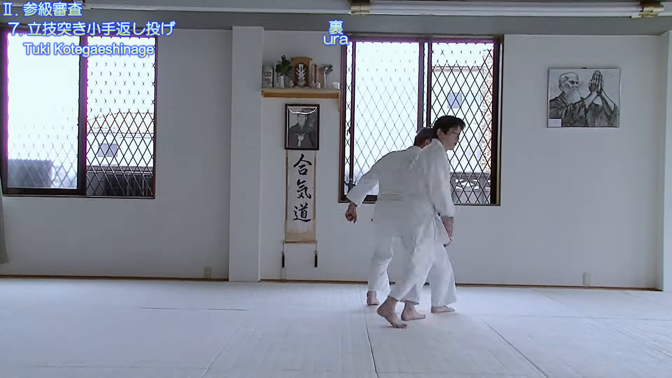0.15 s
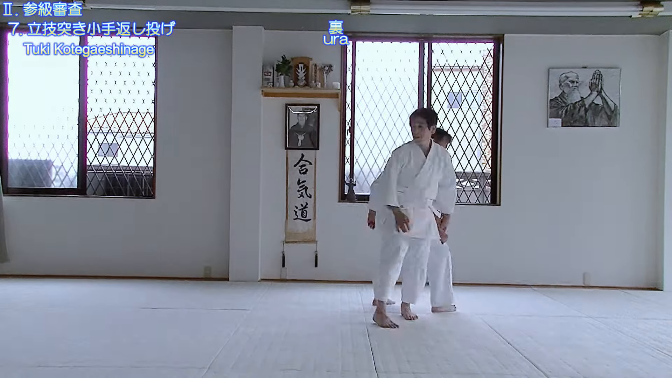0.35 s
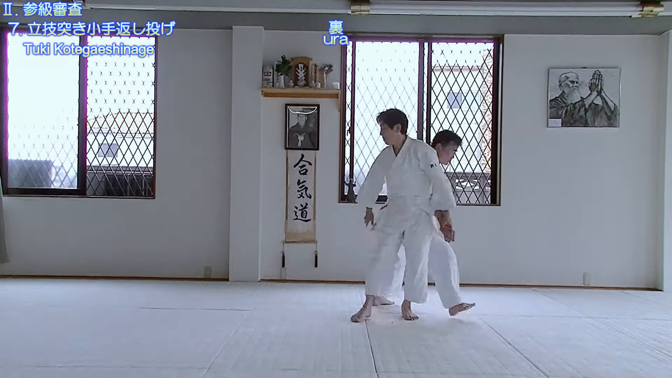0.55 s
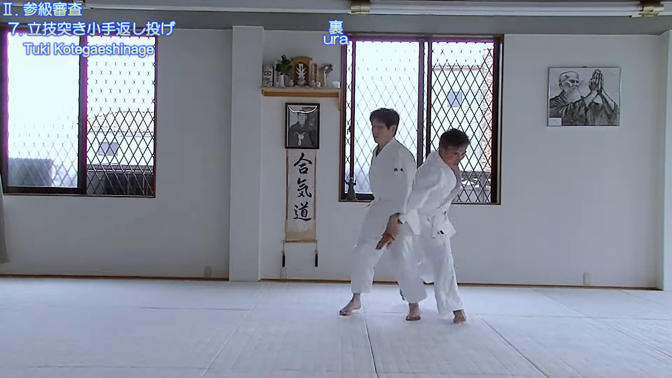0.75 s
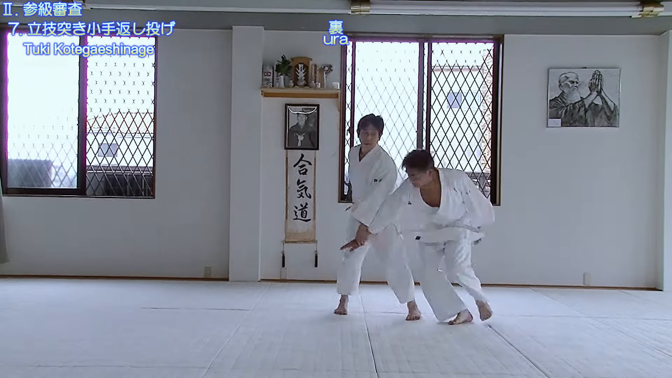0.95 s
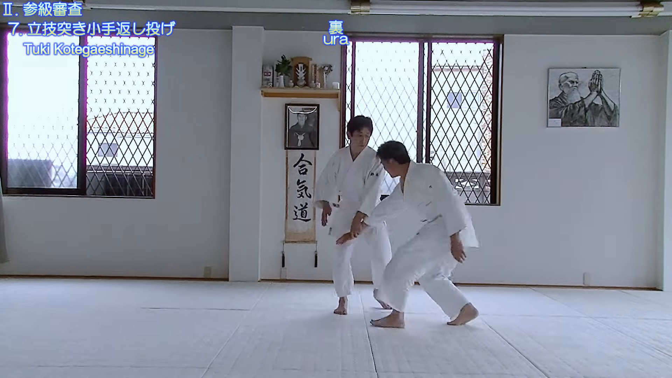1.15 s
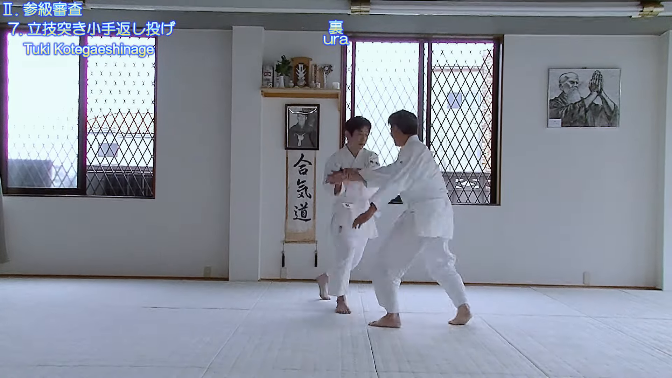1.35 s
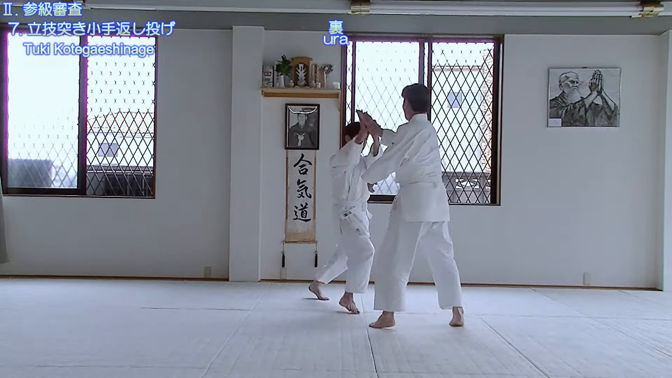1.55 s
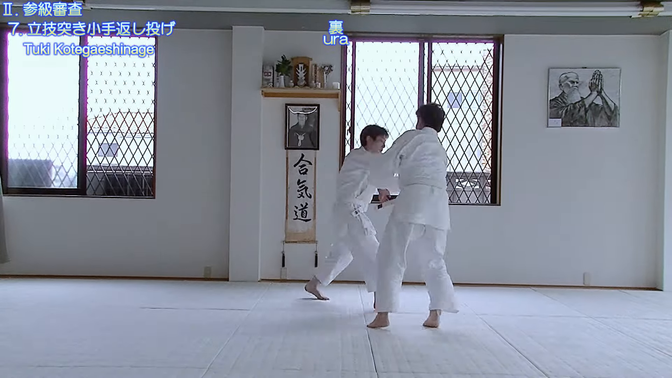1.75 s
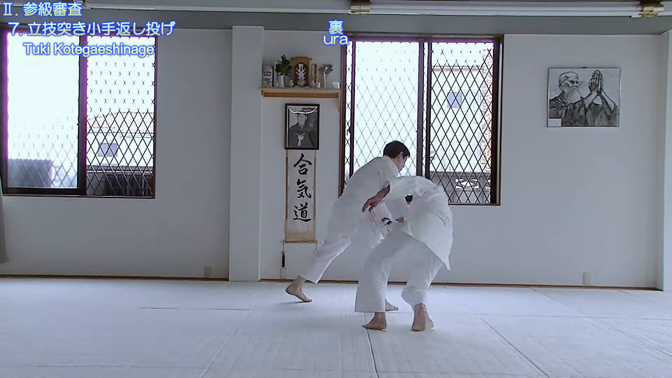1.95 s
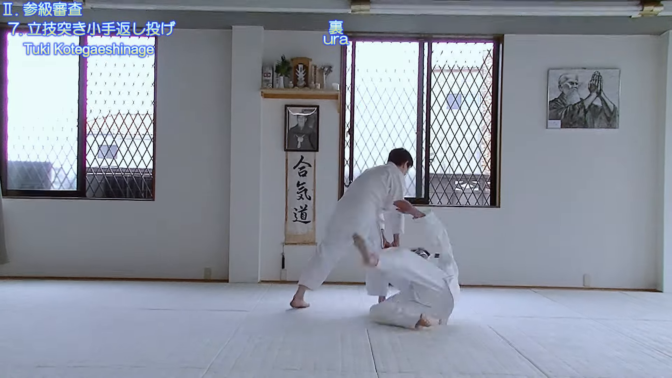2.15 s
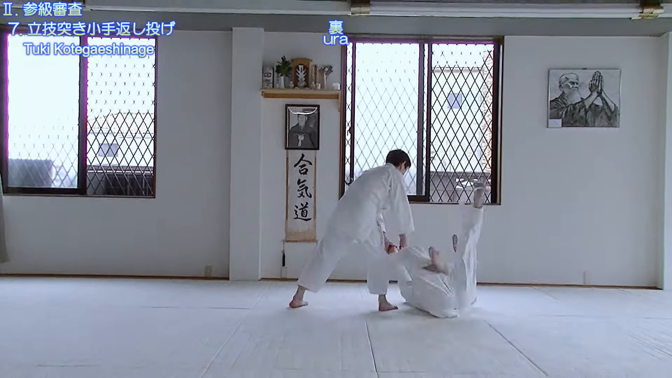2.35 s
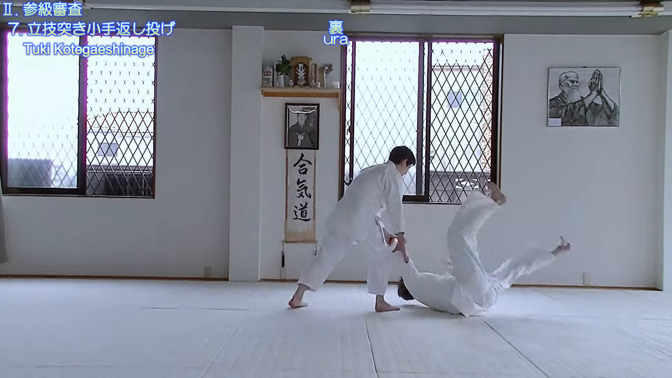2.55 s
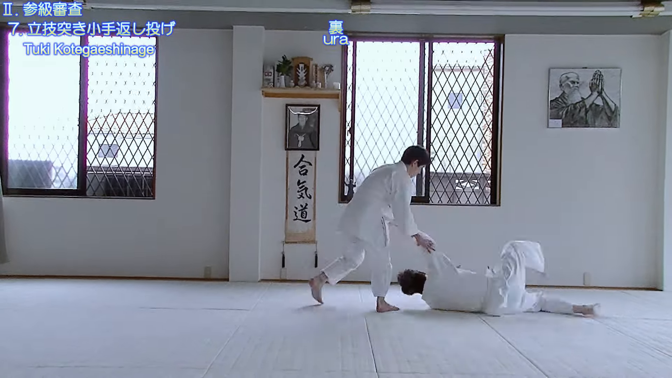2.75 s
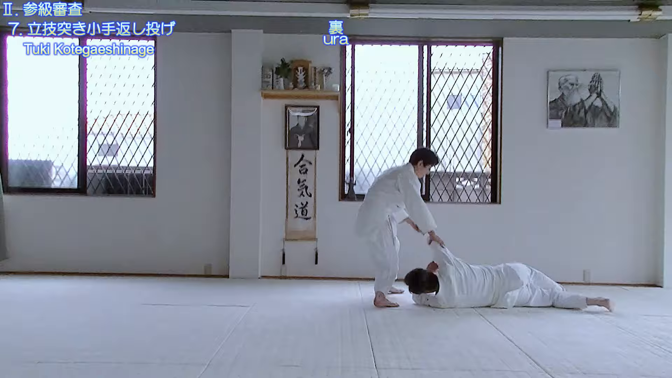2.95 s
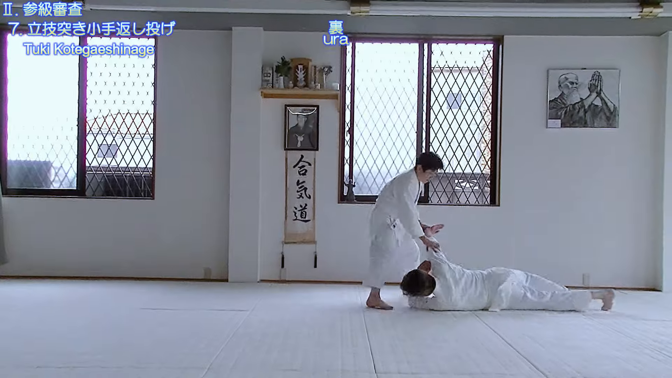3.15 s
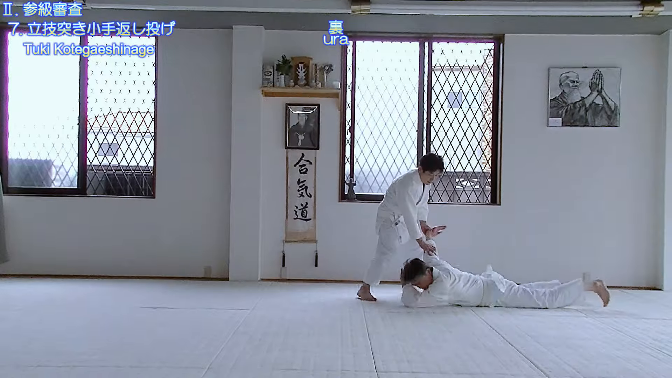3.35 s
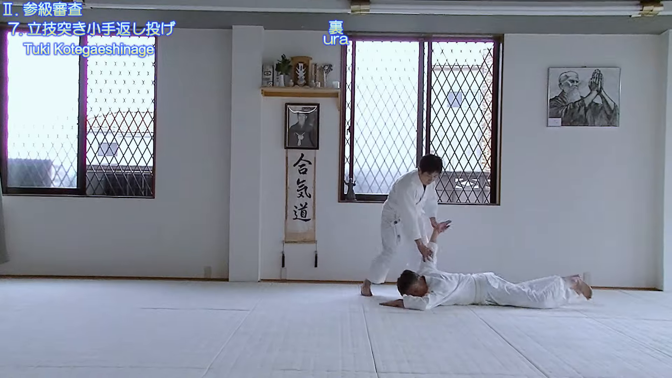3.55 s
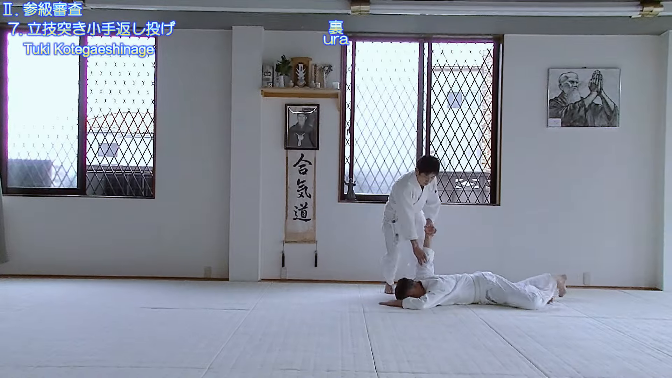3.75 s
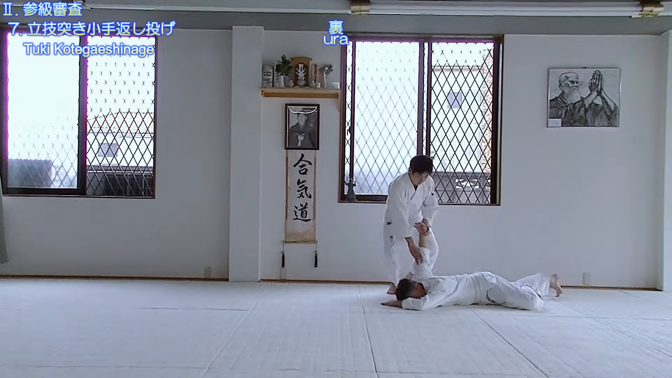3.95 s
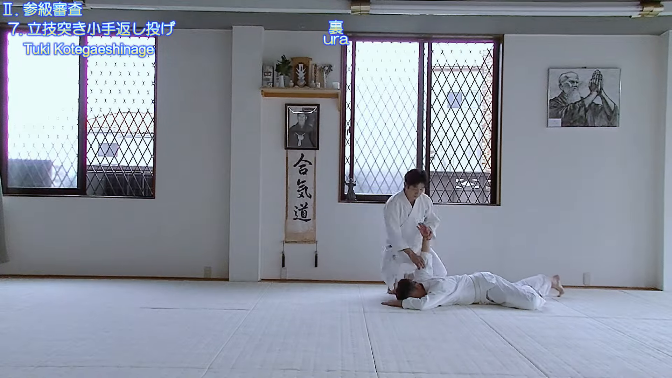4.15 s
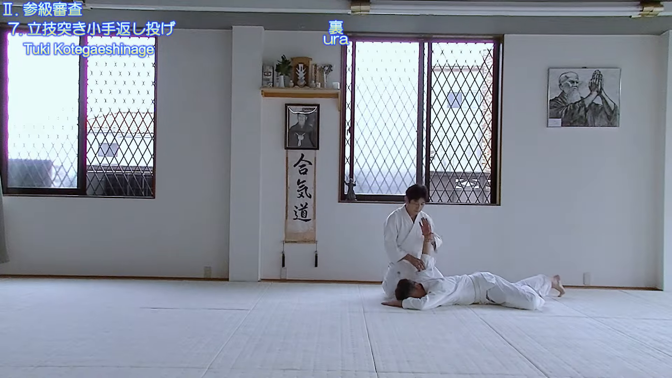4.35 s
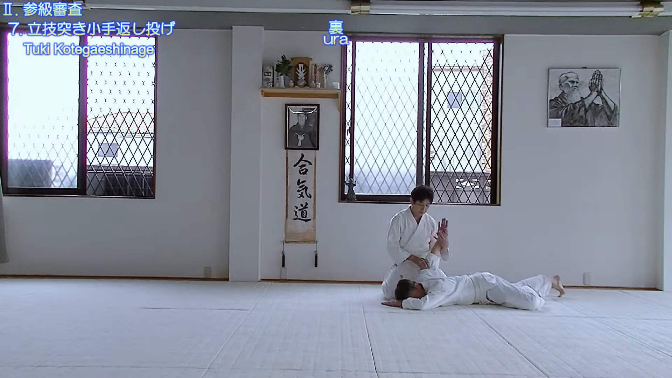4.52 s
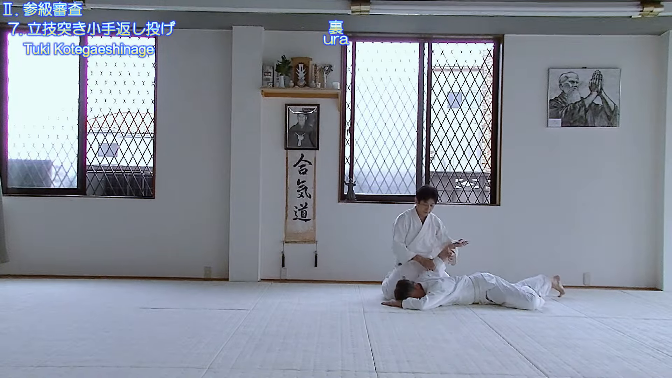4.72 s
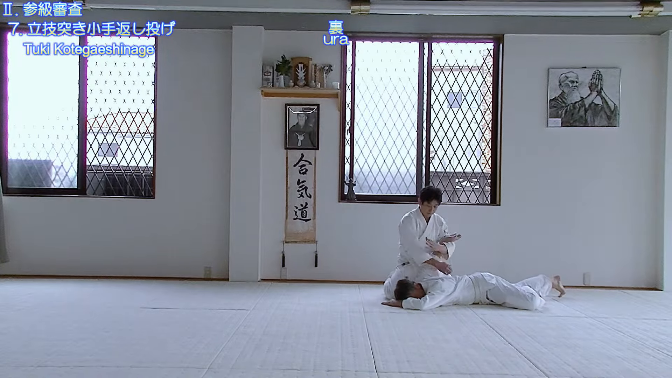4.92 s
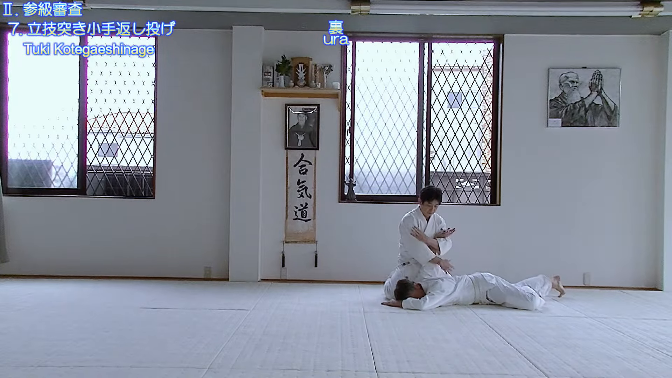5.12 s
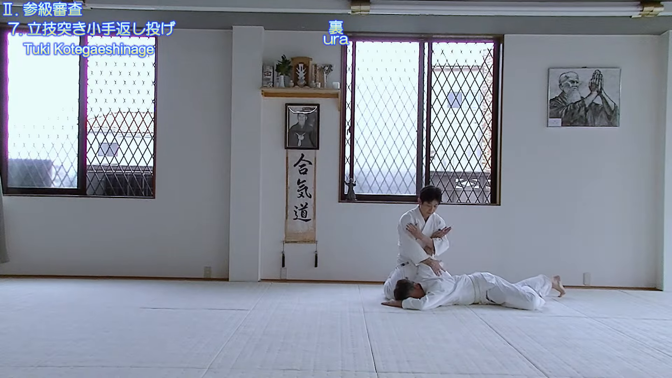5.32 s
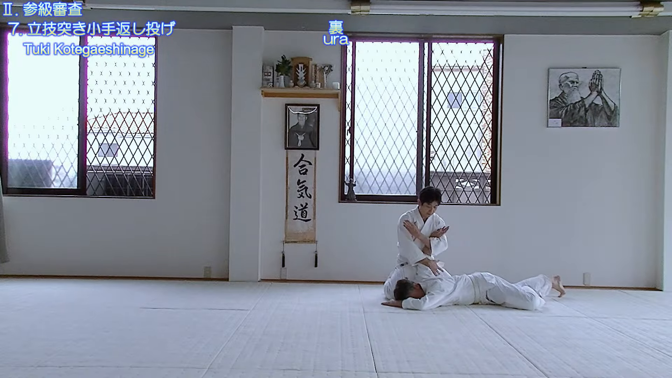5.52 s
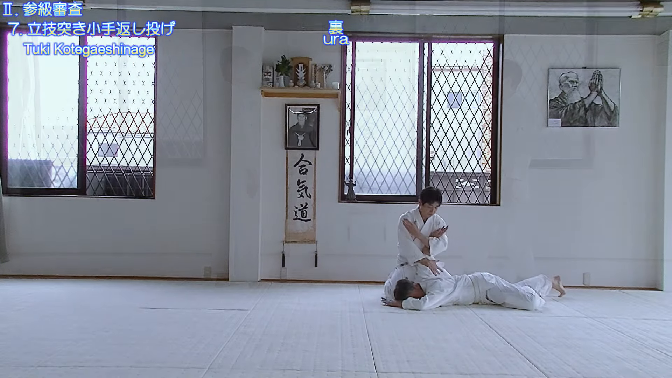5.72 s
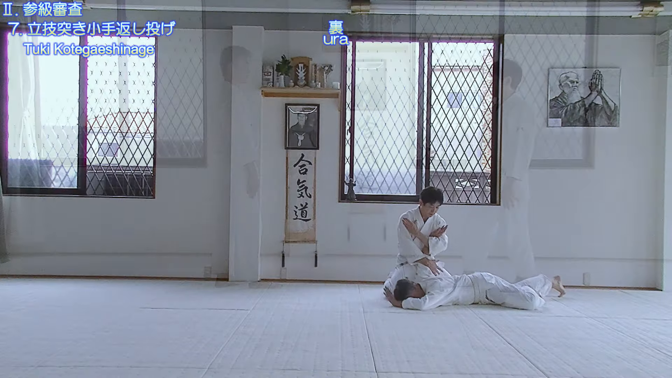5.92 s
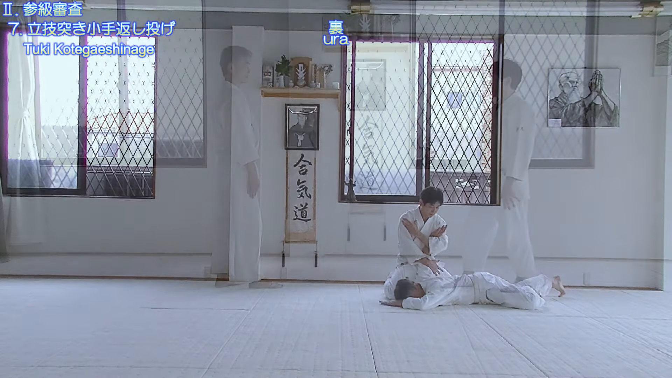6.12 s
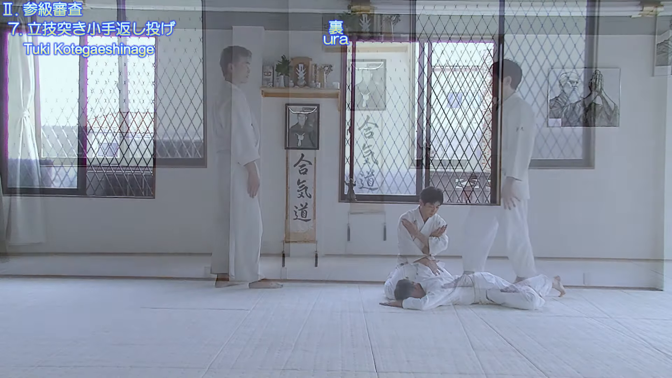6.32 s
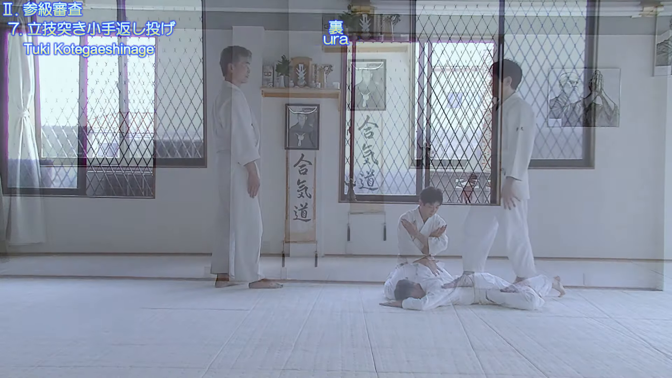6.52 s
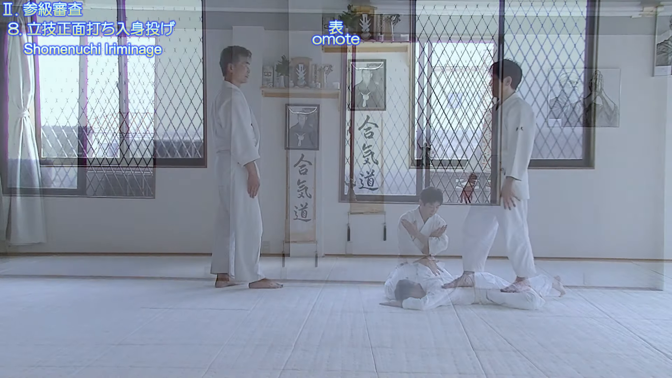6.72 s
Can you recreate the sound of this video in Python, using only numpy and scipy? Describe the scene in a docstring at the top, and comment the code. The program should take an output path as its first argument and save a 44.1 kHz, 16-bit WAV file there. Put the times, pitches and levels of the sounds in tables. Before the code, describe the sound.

Heavy cotton uniforms rustle and bare feet sweep padded mats, then a thrown body lands with hard thumps and slaps in a small bare hall.

```python
"""Cloth rustles, bare feet sweep the mats, then hard blows land and a small, bare hall rings on.
Two people in heavy cotton uniforms practise an aikido throw; one drops, rolls back, slaps down and is pinned.
Cloth, sweeps and slaps are shaped noise; the padded floor thumps as damped sines, the hall as sparse taps.
Under it lie a noise wash, a hum of two wavering sines and a thin whine of narrow noise and a sine."""
import sys
import numpy as np
from scipy import signal
from scipy.fft import rfft, irfft
from scipy.io import wavfile

SR = 44100
rng = np.random.default_rng(int(sys.argv[2]) if len(sys.argv) > 2 else 0)


def dump(signal):
    """Clip the signal to [-1, 1] and save it as 16-bit WAV at the path in sys.argv[1]."""
    limited = np.clip(np.atleast_2d(signal).T, -1, 1)
    pcm = np.round(limited * 32767).astype(np.int16)
    wavfile.write(sys.argv[1], SR, pcm)


N = 303408
TIME = np.arange(N) / SR


def gain_of(db):
    """Decibels to amplitude."""
    return 10 ** (np.asarray(db) / 20)


def evened(x):
    """Scales to an rms of one."""
    return x / np.sqrt(np.mean(x ** 2) + 1e-20)


def level(points):
    """Gain curve over the scene from (t/s, level/dB) points."""
    return gain_of(np.interp(TIME, *np.transpose(points)))


def read(points, hz):
    """Reads a spectrum on a log-frequency axis."""
    f, value = np.transpose(points)
    return np.interp(np.log(hz + 1), np.log(f + 1), value)


def colour(x, points, tilt_db_per_octave=0):
    """Filters by a spectrum, tilted about 1 kHz."""
    hz = np.fft.rfftfreq(len(x), 1 / SR)
    octaves = np.log2((hz + 1) / 1000)
    gain = gain_of(read(points, hz) + tilt_db_per_octave * octaves)
    return irfft(rfft(x) * gain, len(x))


def add(mix, start_s, sound):
    """Mixes a sound in at a time; it may already be under way at zero."""
    start = round(start_s * SR)
    sound = sound[max(-start, 0):]
    part = mix[max(start, 0):][:len(sound)]
    part += sound[:len(part)]


def drift(cutoff_hz):
    """Slow random wander of unit rms: low-passed noise."""
    hz = np.fft.rfftfreq(N, 1 / SR)
    spectrum = rfft(rng.standard_normal(N)) / (1 + (hz / cutoff_hz) ** 4)
    return evened(irfft(spectrum, N))


def hiss(length_s, first_hz, last_hz, width_octaves):
    """Noise band with a gliding centre; 6 dB down one width to either side."""
    hz, t, z = signal.stft(rng.standard_normal(SR), SR, nperseg=512)
    centre = np.interp(t, [0, length_s], np.log2([first_hz, last_hz]))
    away = (np.log2(hz[:, None] + 1) - centre) / width_octaves
    band = signal.istft(z / (1 + away ** 2), SR, nperseg=512)[1]
    return evened(band[:int(length_s * SR)])


# reverberation time of the hall: f/Hz, T60/s
HALL_DECAY = [(60, 0.74), (130, 0.56), (250, 0.73), (600, 0.69), (1500, 0.61), (3000, 0.8), (6000, 0.64),
              (10000, 0.42), (15000, 0.3)]


def hall(x, wet_db):
    """Direct sound plus random wall reflections, each band dying at its own speed."""
    taps = rng.choice([-1., 1.], SR) * (rng.random(SR) < .1)
    hz, t, z = signal.stft(taps, SR, nperseg=256)
    decay = gain_of(-60 * t / read(HALL_DECAY, hz)[:, None])
    tail = signal.istft(z * decay, SR, nperseg=256)[1]
    tail_t = np.arange(len(tail)) / SR
    tail = tail * (1 - np.exp(-(tail_t / 0.0021) ** 2))  # reflections build up over about 2 ms
    reflections = signal.fftconvolve(x, tail / np.linalg.norm(tail))[:len(x)]
    return x + gain_of(wet_db) * reflections


def moving(x, wet_db):
    """A moving body excites four reflection patterns in turn, overlapping, in a 0.4 s cycle."""
    turn = 2 * np.pi * TIME / .4
    out = np.zeros(N)
    for k in range(4):
        share = np.maximum(np.sin(turn + k * np.pi / 2), 0)
        out += hall(x * share, wet_db)
    return out


# wash level: t/s, level/dB
WASH_CURVE = [(0, -46.5), (1.5, -41), (2.6, -40.5), (3.9, -43), (5.35, -43.5), (5.8, -44.5), (6.55, -53),
              (6.88, -52)]
# wash spectrum, relative: f/Hz, density/(dB per Hz)
WASH_SPECTRUM = [(15, -39), (30, -32), (60, -3.5), (145, -4), (200, -2.5), (340, -0.5), (560, -2.5),
                 (950, -3.5), (1400, -4.5), (1900, -8), (2600, -14.5), (3900, -21.5), (7000, -32.5),
                 (13000, -40)]
# hum lines: f/Hz (mean), level/dB re hum curve
HUM_LINES = [(67.3, -4.5), (44.4, -3)]
# hum grows slowly, then fades: t/s, level/dB
HUM_CURVE = [(0, -71), (4, -62.5), (5.7, -57), (6.5, -62), (6.7, -68.5)]
# upper hum line stands out: from t/s, to t/s, rise/dB
UPPER_HUM_SWELL = (2.9, 5.03, 10)


def background():
    """A noise wash with a low hum: two sines whose pitch wanders by 0.74 Hz rms."""
    wash = evened(colour(rng.standard_normal(N), WASH_SPECTRUM))
    wash = wash * gain_of(0.64 * drift(5.2))
    lines = []
    for hz, db in HUM_LINES:
        turns = np.cumsum(hz + 0.74 * drift(0.81)) / SR
        lines.append(gain_of(db) * np.sqrt(2) * np.sin(2 * np.pi * turns))
    upper, lower = lines
    start_s, end_s, swell_db = UPPER_HUM_SWELL
    ramp = np.clip(np.minimum(TIME - start_s, end_s - TIME) / .2, 0, 1)
    hum = gain_of(swell_db * ramp) * upper + lower
    return level(WASH_CURVE) * wash + level(HUM_CURVE) * hum


WHINE_CHANGE_S = 6.6  # the fuzzy band drops and a clean line joins
FUZZY_DB, FUZZY_DROP_DB, CLEAN_DB = -61.5, -15, -61


def whine():
    """A thin electrical whine: narrow noise with a sharp peak, later mostly a sine."""
    hz = np.fft.rfftfreq(N, 1 / SR)
    skirt = 1 / (1 + ((hz - 14450) / 420) ** 4)
    peak = 2.5 / (1 + ((hz - 14351) / 9) ** 2)
    band = evened(irfft(rfft(rng.standard_normal(N)) * (skirt + peak), N))
    line = np.sqrt(2) * np.sin(2 * np.pi * 14245 * TIME)
    changed = TIME > WHINE_CHANGE_S
    fuzzy = gain_of(FUZZY_DB + FUZZY_DROP_DB * changed) * band
    return fuzzy + gain_of(CLEAN_DB) * changed * line


# skin sticks on the cover: t/s, length/s, level/dB (before the hall), f/Hz (mean)
FOOT_SQUEAK = (2.466, .075, -49, 3530)


def squeak():
    """A pivoting foot sticks and slips for a moment: a short sine of unsteady pitch."""
    start_s, length_s, db, hz = FOOT_SQUEAK
    window = np.sin(np.pi * np.clip((TIME - start_s) / length_s, 0, 1))
    turns = np.cumsum(hz * (1 + 0.0064 * drift(68.0))) / SR
    return hall(gain_of(db) * window * np.sin(2 * np.pi * turns), -18)


# cotton spectrum, relative: f/Hz, density/(dB per Hz)
CLOTH_SPECTRUM = [(100, -16), (250, 1), (600, -1.5), (1500, -2.5), (2500, -2), (4000, -0.5), (5300, -2),
                  (7500, -5.5), (10000, -8.5), (13000, -11.5), (15000, -23), (16000, -14.5)]
# movements that rub the uniforms, level before trim and hall:
# peak t/s, swell/s, fade/s, level/dB, tilt/(dB per octave)
CLOTH_RUBS = [ (0.02, .25, 0.19, -30, 1.05), (0.30, .1, 0.25, -45.5, 0), (0.58, .09, .19, -40.5, -0.5),
              (0.96, 0.094, 0.091, -49, 1), (1.17, .15, .2, -37.5, 2), (1.76, .22, 0.21, -44, -1.5),
              (2.05, 0.21, 0.093, -36.5, -0.5), (2.26, 0.027, 0.073, -34, 1.5),
              (2.499, .1, 0.38, -56.5, 1.5), (2.88, 0.039, 0.18, -37.5, -1), (3.00, .09, .13, -37, -0.5),
              (3.22, .07, 0.13, -38.5, 1), (3.30, .07, 0.24, -37.5, -2.5), (3.56, 0.11, 0.5, -49, 1),
              (4.57, .15, .5, -65, 3), (6.821, 0.44, .3, -64, -3), ]
RUSTLE_TRIM_DB = -1.0
FADE_POWER = 1.4  # above 1: a movement dies away faster and faster


def uniforms():
    """Cotton rubs on cotton: fibre noise with snaps where folds buckle; each movement swells and fades."""
    out, t = np.zeros(N), np.arange(2 * SR) / SR
    for peak_s, swell_s, fade_s, db, tilt_db in CLOTH_RUBS:
        fibres = rng.standard_normal(len(t))
        snaps = rng.standard_normal(len(t)) * (rng.random(len(t)) < 350 / SR)  # about 350 per s
        rub = evened(colour(fibres + 0.22 * evened(snaps), CLOTH_SPECTRUM, tilt_db))
        rise = np.minimum(t / swell_s, 1)
        fall = np.exp(-(np.maximum(t - swell_s, 0) / fade_s) ** FADE_POWER)
        add(out, peak_s - swell_s, gain_of(db) * rise * fall * rub)
    flutter = gain_of(0.7 * drift(31))
    return gain_of(RUSTLE_TRIM_DB) * moving(out * flutter, -5.0)


# soles, limbs and sleeves on the mats, level before grip and hall:
# t/s, length/s, level/dB, first f/Hz, last f/Hz, half-width/octaves
MAT_SWEEPS = [ (-0.02, 0.14, -40, 1300, 1200, 4.5), (0.059, .13, -40, 7400, 7700, 0.5),
              (0.26, 0.21, -47.5, 1660, 1330, 0.52), (0.534, .08, -46.5, 7100, 6460, 0.17),
              (0.595, 0.048, -41.5, 3850, 2300, .2), (0.619, 0.14, -41.5, 1000, 600, 0.86),
              (1.045, 0.094, -43, 1900, 4500, 0.81), (1.102, 0.28, -46.5, 5270, 4900, 0.35),
              (1.709, .36, -60, 910, 1100, 2.5), (1.99, 0.24, -45, 2420, 1700, 0.97),
              (2.163, .035, -36.5, 1690, 1740, 0.17), (2.344, 0.2, -45.5, 595, 694, 0.55),
              (2.942, .15, -36.5, 666, 654, 0.11), (3.194, .035, -41, 3190, 3430, .18),
              (3.255, .07, -38.5, 3600, 3060, 0.61), (3.303, 0.33, -41, 670, 890, 1.17),
              (3.466, 0.04, -33.5, 1010, 1080, 0.052), (3.478, .024, -30.5, 4000, 3440, 0.34),
              (3.592, 0.3, -45.5, 600, 700, 1.54), ]


def sweeps():
    """Skin and cloth run over the mat cover: hiss bands whose pitch glides with their speed."""
    out = np.zeros(N)
    for start_s, length_s, db, first_hz, last_hz, width in MAT_SWEEPS:
        stroke = hiss(length_s, first_hz, last_hz, width)
        add(out, start_s, gain_of(db) * stroke * signal.windows.tukey(len(stroke), .5))
    uneven_grip = gain_of(1.0 * drift(74))
    return moving(out * uneven_grip, -1.4)


THUMP_CYCLES = 1.88  # swings of the padding until 1/e is left
# body weight on the padded floor, relative: f/Hz, density/(dB per Hz)
THUD_SPECTRUM = [(25, -51), (48, -33), (65, -6), (85, -6.5), (150, -3.5), (250, 1), (380, -4.5), (520, -6),
                 (750, -6), (1100, -13), (2000, -31), (5000, -63.5)]
# skin and cloth smacking the cover, relative: f/Hz, density/(dB per Hz)
SLAP_SPECTRUM = [(100, -33), (300, 7.5), (600, -3), (1000, -5.5), (1400, -3.5), (2050, -2), (2800, -8),
                 (3800, -12.5), (5200, -16.5), (9000, -26), (13000, -33), (16000, -47)]


def contact(thump_db, hz, thud_db, slap_db, tilt_db, rise_s, decay_s):
    """The padding swings a few times while a patter of contacts spreads over the mat."""
    t = np.arange(SR) / SR
    weight, skin = rng.standard_normal((2, SR))
    onset = 1 - np.exp(-t / rise_s)
    swing = np.exp(-t * hz / THUMP_CYCLES) * np.sin(2 * np.pi * hz * t)
    thump = gain_of(thump_db) * swing
    thud = gain_of(thud_db) * evened(colour(weight, THUD_SPECTRUM)) * np.exp(-t / (1.24 * decay_s))
    # folds of cloth land one after another: a cluster of small cracks
    cracks = skin * (0.3 + (rng.random(SR) < 2200 / SR) * 3.4)
    slap = gain_of(slap_db) * evened(colour(cracks, SLAP_SPECTRUM, tilt_db)) * np.exp(-t / decay_s)
    return hall(onset * thump, -2.0) + hall(onset * (thud + slap), 0.17)


# soft loads from a step or a rolling body, levels before onset and hall:
# t/s, thump level/dB, thump f/Hz, thud level/dB, slap decay/s
SOFT_LOADS = [ (0.074, -26.5, 148, -43, .044), (0.31, -39, 67, -68, .03), (0.635, -52, 202, -43, 0.034),
              (2.071, -13, 233, -29, 0.042), (2.212, -11, 239, -20, .02), (2.240, -28, 257, -20.5, 0.036),
              (2.531, -20.5, 280, -34, 0.01), (2.776, -4, 416, -23.5, 0.043),
              (2.900, -23.5, 66, -24, 0.036), (2.950, -12.5, 189, -27, 0.064), (3.013, -15, 241, -33, .012),
              (3.320, -10, 290, -34, 0.093), (3.562, -24, 363, -28, 0.033), ]
STEP_RISE_SHARE = 0.13  # rise time as a share of the slap decay
STEP_SLAP_DB, STEP_TILT_DB = -7.5, 0  # light smack: re its thud; per octave


def steps():
    """Weight comes down gradually: the longer the contact, the softer its start."""
    out = np.zeros(N)
    for start_s, thump_db, hz, thud_db, decay_s in SOFT_LOADS:
        slap_db = thud_db + STEP_SLAP_DB
        rise_s = STEP_RISE_SHARE * decay_s
        add(out, start_s, contact(thump_db, hz, thud_db, slap_db, STEP_TILT_DB, rise_s, decay_s))
    return out


# hard landings and slaps, levels before onset and hall: t/s, thump level/dB, thump f/Hz,
# thud level/dB, slap level/dB, slap tilt/(dB per octave), sleeve level/dB, slap decay/s
HARD_LANDINGS = [ (2.1858, -6, 253, -12.5, -18.5, -2.5, -55, 0.01),
                 (2.7114, -18, 114, -15, -18.5, 0, -36, 0.018),
                 (2.8475, -6, 245, -15, -11.5, -0.64, -40, 0.009),
                 (3.4836, -10, 300, -18.5, -20.5, -0.5, -34.5, .014),
                 (6.0785, -24.5, 229, -29.5, -25.5, -0.5, -38.5, 0.012), ]
FALL_RISE_S, SLEEVE_DECAY_S = 0.0013, .024
REBOUND_S, REBOUND_DB = .027, -6.5  # the limb bounces and meets the mat once more
REBOUND_THUMP_DB, REBOUND_SLAP_DB = -1, -7.5  # further change of thump and slap
BUZZ_HZ, BUZZ_OCTAVES, BUZZ_DECAY_S = 2050, .13, 0.12
BUZZ_DB, BUZZ_DB_PER_SLAP_DB = -13.5, 1.86  # level at a 0 dB slap; grows faster than the slap


def falls():
    """A body or limb hits the mat hard and rebounds; the sleeve cracks and a buzz lingers."""
    out, t = np.zeros(N), np.arange(SR) / SR
    for start_s, thump_db, hz, thud_db, slap_db, tilt_db, sleeve_db, decay_s in HARD_LANDINGS:
        add(out, start_s, contact(thump_db, hz, thud_db, slap_db, tilt_db, FALL_RISE_S, decay_s))
        rebound = contact(thump_db + REBOUND_THUMP_DB, hz, thud_db, slap_db + REBOUND_SLAP_DB,
                          tilt_db, 2 * FALL_RISE_S, decay_s)
        add(out, start_s + REBOUND_S, gain_of(REBOUND_DB) * rebound)
        cloth = evened(colour(rng.standard_normal(SR), CLOTH_SPECTRUM))
        sleeve = gain_of(sleeve_db) * cloth * np.exp(-t / SLEEVE_DECAY_S)
        buzz_gain = gain_of(BUZZ_DB + BUZZ_DB_PER_SLAP_DB * slap_db)
        buzz = buzz_gain * hiss(1, BUZZ_HZ, BUZZ_HZ, BUZZ_OCTAVES) * np.exp(-t / BUZZ_DECAY_S)
        onset = 1 - np.exp(-t / 0.002)
        add(out, start_s, hall((sleeve + buzz) * onset, -1))
    return out


# stereo width: f/Hz, side re mid level/dB
SIDE_SPECTRUM = [(60, -38), (250, -34), (600, -21), (1200, -15), (2500, -11), (4500, -8), (8500, -8),
                 (10000, -11.5), (11500, -19), (12500, -28)]
# lean to the right: f/Hz, left minus right level/dB
RIGHT_LEAN = [(60, -1.75), (300, -1.75), (700, -1.4), (1400, -.7), (3000, 0), (14000, 0)]


def scene():
    """Two closely spaced microphones; they differ where the treble arrives from all round."""
    mid = background() + whine() + squeak() + uniforms() + sweeps() + steps() + falls()
    z = signal.stft(mid, SR, nperseg=128)[2]
    random_phase = np.exp(2j * np.pi * rng.random(z.shape))
    diffuse = signal.istft(z * random_phase, SR, nperseg=128)[1][:N]
    side = colour(diffuse, SIDE_SPECTRUM)
    left_gain = [(hz, db / 2) for hz, db in RIGHT_LEAN]
    right_gain = [(hz, -db / 2) for hz, db in RIGHT_LEAN]
    return np.array([colour(mid + side, left_gain), colour(mid - side, right_gain)])


EDGE_HZ = 15750


def record(dry):
    """The recorder's band limit: a linear-phase low-pass."""
    lowpass = signal.firwin(511, EDGE_HZ, window=("kaiser", 9), fs=SR)
    return signal.oaconvolve(dry, lowpass[None], "same")


dry = scene()
out = record(dry)
dump(out)
```